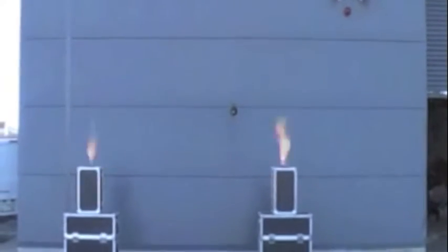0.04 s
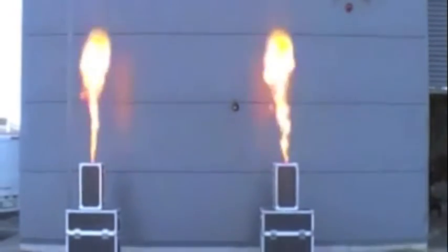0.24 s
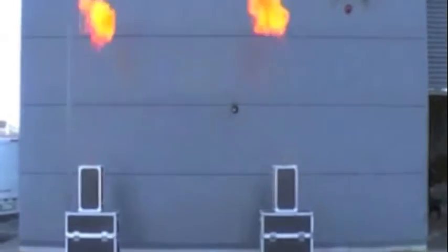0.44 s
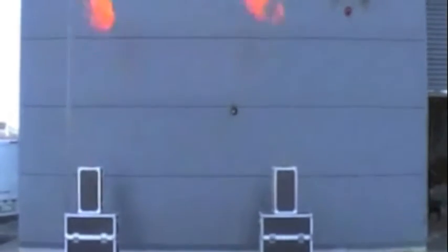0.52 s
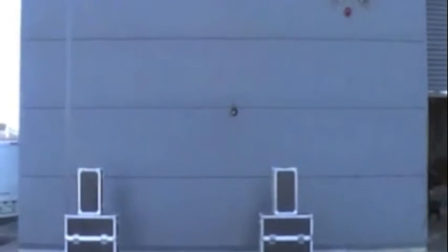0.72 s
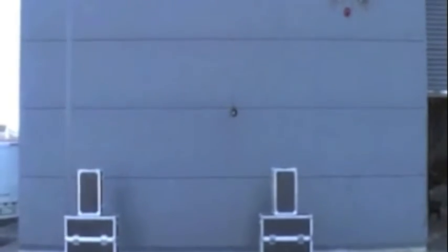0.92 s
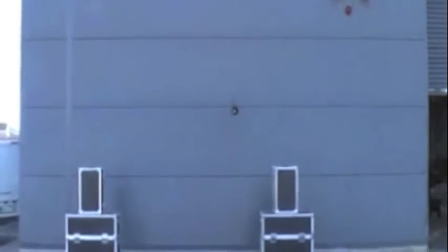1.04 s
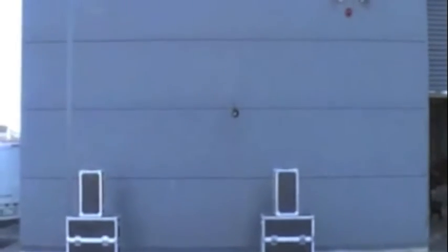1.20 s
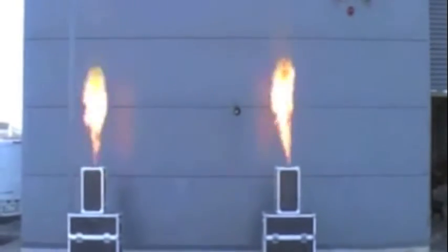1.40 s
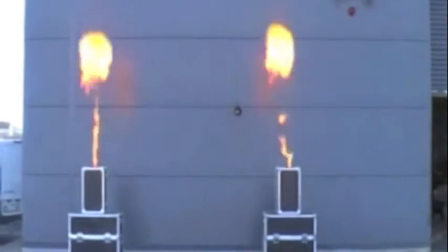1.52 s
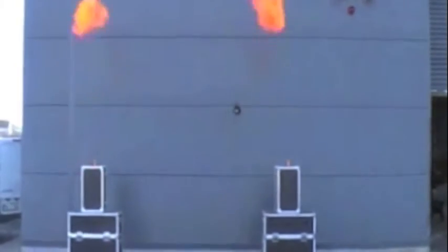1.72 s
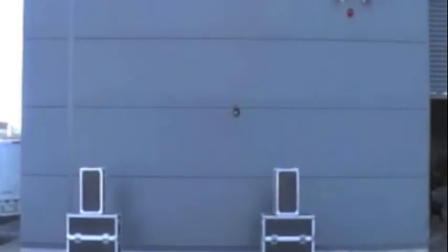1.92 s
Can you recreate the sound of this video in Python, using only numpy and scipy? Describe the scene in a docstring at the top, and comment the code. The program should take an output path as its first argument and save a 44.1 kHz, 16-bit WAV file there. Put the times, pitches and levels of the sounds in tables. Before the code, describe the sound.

Flame projectors straight ahead fire twice, each time with a low boom and a short ragged roar. Brief gas hisses come before each burst, slightly to the right, echoing off a metal wall over humming machinery and light wind.

```python
"""In front of a large metal wall, machinery hums all round and a light breeze ruffles the microphone.
Two short, flameless hisses of gas come from a little to the right. At 0.2 s two flame projectors
straight ahead fire as one: a valve opens, gas hisses, catches with a low boom and a ragged roar, and
the fireball flutters away upwards. Two more hisses follow, the first ending in a faint puff, and near
1.5 s the projectors fire again. The wall answers every shot and hiss."""
import sys
import numpy as np
from scipy import signal
from scipy.fft import rfft, irfft, next_fast_len
from scipy.io import wavfile
from scipy.ndimage import map_coordinates

SR = 44100
rng = np.random.default_rng(int(sys.argv[2]) if len(sys.argv) > 2 else 0)


def unload_audio(sound):
    """Save the sound as a 16-bit wav file, at the path given as the first command line argument."""
    columns = np.transpose(np.atleast_2d(sound))
    # keep every value between -1 and 1, then stretch to whole-number steps
    steps = np.round(np.clip(columns, -1, 1) * 32767)
    wavfile.write(sys.argv[1], SR, steps.astype(np.int16))


N = 85995


def amp(db):
    """Decibels to gain."""
    return 10 ** (np.asarray(db) / 20)


def unit(x):
    """Scaled to rms 1."""
    return x / np.sqrt(np.mean(x ** 2) + 1e-20)


def along(points, hz):
    """Reads a curve of (f/Hz, value) points on a log frequency axis."""
    freqs, values = np.transpose(points)
    return np.interp(np.log(hz + 1), np.log(freqs + 1), values)


def wobble(rate):
    """A smooth random curve, rate knots a second."""
    knots = rng.standard_normal(int(N * rate / SR) + 4)
    return map_coordinates(knots, [np.arange(N) * rate / SR])


def filtered(x, response):
    """Filters x by a gain given as a function of frequency."""
    size = next_fast_len(N + SR // 2)
    return irfft(rfft(x, size) * response(np.fft.rfftfreq(size, 1 / SR)), size)[..., :N]


def spread(pair, width):
    """Left and right from a mid signal and a share of a side signal."""
    mid, side = pair
    return np.array([mid + width * side, mid - width * side]) / np.hypot(1, width)


def rush(spectrum, width=0):
    """Coloured stereo noise of rms 1."""
    noise = filtered(rng.standard_normal((2, N)), lambda hz: amp(along(spectrum, hz)))
    return unit(spread(noise, width))


def gate(start, length, attack_s, release_s):
    """Rises, holds, then falls 20 dB in each release time."""
    age = np.arange(N) / SR - start
    return np.clip(age / attack_s, 0, 1) * amp(-20 * np.maximum(age - length, 0) / release_s)


def tone(hz):
    """A sine of rms 1 on a pitch curve."""
    return np.sqrt(2) * np.sin(2 * np.pi * (np.cumsum(hz) / SR + rng.random()))


# Fan noise around the microphone: f/Hz, relative level/dB
FAN_SPECTRUM = [(15, -40), (25, -17), (45, -8), (70, 1.5), (95, 6), (130, 1), (200, -2.5), (300, -9.5),
                (470, -8), (570, -5), (750, -12), (1000, -5), (1350, -8), (1650, -14.5), (2300, -21),
                (3500, -22.5), (5000, -33), (7000, -45), (12000, -45)]
# How alike the fans sound left and right: f/Hz, correlation/0-1
FAN_LIKENESS = [(30, 0.3), (100, 0.23), (250, 0.76), (600, 0.87), (1100, 0.82), (3000, 0.97), (4500, 1),
                (12000, .98)]
def fans():
    """A steady bed of moving air, wide in the bass and central in the treble."""
    def mid_side_gains(hz):
        angle = np.arccos(np.clip(along(FAN_LIKENESS, hz), -1, 1)) / 2
        return amp(along(FAN_SPECTRUM, hz)) * [np.cos(angle), np.sin(angle)]
    air = filtered(rng.standard_normal((2, N)), mid_side_gains)
    return amp(-37.5) * unit(spread(air, width=1))


# Machine tones in the background: f/Hz, relative level/dB
MACHINE_TONES = [(97, -44), (581, -54), (657, -55), (850, -54), (873, -53), (921, -53), (969, -56),
                 (995, -50), (1066.5, -51), (1092, -51), (1163, -56), (1308, -57), (1334, -57), (1432, -57)]
def machine_hum(waver_db=1.2, drift_hz=0.7):
    """A low hum and a cluster of whines, each wavering in level and pitch."""
    return amp(0.3) * sum(amp(db + waver_db * wobble(9.36)) * tone(hz + drift_hz * wobble(12.24))
                          for hz, db in MACHINE_TONES)


# Wind right on the microphone: f/Hz, relative level/dB
BREEZE_SPECTRUM = [(20, -31), (60, 0), (110, -2), (190, 3), (260, -7), (350, -11), (500, -37), (900, -12),
                   (2500, -73)]
def breeze(gust_db=4.5):
    """Light wind rumbles in lumps, pushing the two microphone ports mostly in opposite senses."""
    return amp(-43) * unit(rush(BREEZE_SPECTRUM, width=2.9) * amp(gust_db * wobble(22)))


# Ring of the metal wall beyond the projectors: f/Hz, time to fall 60 dB/s
WALL_DECAY = [(100, 0.4), (1000, 0.71), (4000, 1), (8000, 0.69), (12000, 0.49)]
def wall_echo(sound):
    """The wall throws the sound back to the microphone; each frequency dies at its own speed."""
    hz, t, noise = signal.stft(rng.standard_normal((2, SR)), SR, nperseg=256)
    decay = amp(-60 * t / along(WALL_DECAY, hz)[:, None])
    tail = spread(signal.istft(noise * decay, SR, nperseg=256)[1], width=0.017)
    tail /= np.linalg.norm(tail[0])
    return signal.fftconvolve(sound.mean(axis=0)[None], tail, axes=1)[:, :N]


# Unlit gas leaving the nozzle: f/Hz, relative level/dB
SPRAY_SPECTRUM = [(20, -60), (150, -14), (1200, -11.5), (2000, -9), (2600, -3), (3300, -6), (4400, -3.5),
                  (5000, -4), (5700, -0.5), (7200, 1.5), (8400, 5), (9300, 1), (10500, 4.5), (12000, 0.5)]
# Whistling resonances of the nozzle: f/Hz, bandwidth/Hz, boost/dB
NOZZLE_RESONANCES = [(2560, 210, 3), (5000, 220, 6), (8300, 640, 0.5), (10600, 400, 0.5)]
def spray(tilt_db, pivot_hz=8000):
    """Turbulent gas, coloured by the nozzle's resonances and tilted by tilt_db per octave."""
    def colour(hz):
        whistle_db = sum(db / (1 + (2 * (hz - centre) / width) ** 2)
                         for centre, width, db in NOZZLE_RESONANCES)
        return amp(along(SPRAY_SPECTRUM, hz) + whistle_db + tilt_db * np.log2((hz + 1) / pivot_hz))
    return unit(filtered(rng.standard_normal(N), colour))


# Flameless hisses, a little right of the microphone:
# t/s, length/s, level/dB, sag at mid-length/dB, starting width/0-1, tilt/dB per octave, opening spit/dB
GAS_HISSES = [(-.06, 0.11, -30, 2.5, 0, -0.5, 0), (.145, 0.055, -30, -0.5, .01, 0.5, 2.5),
              (0.537, 0.2, -30, 5.5, 0.56, -0.5, 1.5), (1.001, 0.16, -33, 1, 0.96, -1.5, 1.5)]
def hiss(start, length, db, sag_db, width, tilt_db, spit_db):
    """A valve lets gas through the nozzle; a hiss that starts wide draws in to the middle."""
    leak_s, spit_s, attack_s, release_s = 0.031, 0.031, 0.019, 0.035
    age = np.maximum(np.arange(N) / SR - start, 0)
    progress = np.minimum(age / length, 1)
    sag = sag_db * np.sin(np.pi * progress) ** 2
    spit = spit_db * np.exp(-(age / spit_s) ** 2)
    level_db = db - sag + spit + 0.68 * wobble(39.8)
    # a little gas escapes just before the valve is open
    leak = amp(-16.5) * gate(start - leak_s, leak_s, attack_s, release_s)
    opening = np.maximum(leak, gate(start, length, attack_s, release_s))
    narrowing = np.clip((0.95 - progress) / 0.41, 0, 1)
    mid = spray(tilt_db)
    side = width * narrowing * spray(tilt_db)
    return amp(level_db) * opening * np.array([mid + side, mid - side])


def throb(hz, wander_hz):
    """The unsteady pulsing of a ball of burning gas."""
    return tone(hz + wander_hz * wobble(80)) * amp(wobble(60))


# Small puffs straight ahead: t/s, length/s, level/dB
GAS_PUFFS = [(0.201, 0.019, -28.5), (0.707, 0.093, -41.5)]
def puff(start, length, db):
    """A little gas burns with a soft, hollow puff."""
    return amp(db) * gate(start, length, attack_s=0.0044, release_s=0.016) * throb(262, wander_hz=20.7)


# The loose fireball above the projectors: f/Hz, relative level/dB
FLUTTER_SPECTRUM = [(20, -29), (70, 4.5), (120, 1.5), (270, 2), (420, -5.5), (800, -33), (2000, -21),
                    (8000, -73)]
def flutter(shut, attack_s=0.02, hold_s=0.078):
    """The fireball burns out unevenly after the valve shuts."""
    burnout = gate(shut - attack_s, attack_s + hold_s, attack_s, release_s=0.12)
    return amp(-10.5) * burnout * unit(rush(FLUTTER_SPECTRUM, width=0.24) * amp(1.2 * wobble(90)))


# The projectors' gas jet, dead centre: f/Hz, relative level/dB
JET_SPECTRUM = [(300, 2), (520, 22.5), (1000, 9.5), (3000, 3.5), (4500, 3.5), (6000, 6), (7500, 6),
                (9000, 3), (10500, 5.5), (12000, -19)]
def jet(start, length, burning, spurt_db, attack_s=0.0023, unlit_db=-3):
    """Gas rushes out with a first spurt that dies fast; the flow is softer until it burns."""
    flow = amp(unlit_db) * gate(start, length, attack_s, release_s=0.045)
    spurt = amp(spurt_db) * gate(start, attack_s, attack_s, release_s=0.01)
    return np.maximum(np.hypot(flow, spurt), burning) * rush(JET_SPECTRUM)


def boom(lit, delay_s=0.018):
    """The swelling fireball pulses just after the gas catches."""
    pulsing = spread([throb(117, wander_hz=7) for _ in range(2)], width=0.058)
    return gate(lit + delay_s, length=0.068, attack_s=0.014, release_s=0.06) * pulsing


# The burning jet as it reaches the microphone: f/Hz, relative level/dB
ROAR_SPECTRUM = [(15, -45), (25, -24), (45, -12), (65, -4.5), (90, -4.5), (185, 2.5), (250, -4),
                 (320, -6.5), (430, -4), (480, -14.5), (525, 1.5), (580, -8.5), (630, -7), (750, -9),
                 (850, -16.5), (1300, -16.5), (2000, -21), (3000, -24), (4500, -41), (12000, -52)]
def roar(lit, burn_s, rumble_hz=450, sag_db=3):
    """Eddies of burning gas; their bass thins as the fireball climbs."""
    eddies = rush(ROAR_SPECTRUM, width=0.01)
    rumble = filtered(eddies, lambda hz: 1 / (1 + (hz / rumble_hz) ** 2) ** 2)
    climb = np.clip((np.arange(N) / SR - lit) / burn_s, 0, 1)
    return eddies - rumble + amp(-sag_db * climb ** 2) * rumble


# Flame shots, straight ahead of the microphone: t/s, valve open/s, ignition delay/s,
# roar level/dB, jet level/dB, boom over roar/dB, first spurt over jet/dB
FLAME_SHOTS = [(0.21, 0.19, 0.037, -20.5, -28, 7, -17), (1.461, 0.17, 0.032, -21, -32, 3.5, -1.5)]
def flame(start, length, delay, roar_db, jet_db, boom_db, spurt_db):
    """One shot: the jet spurts, ignites, booms and roars; the loose fireball burns out."""
    lit, burn_s = start + delay, length - delay
    burning = gate(lit, burn_s, attack_s=0.018, release_s=0.061)
    gas = jet(start, length, burning, spurt_db)
    fire = burning * roar(lit, burn_s) + amp(boom_db) * boom(lit) + flutter(start + length)
    return amp(jet_db) * gas + amp(roar_db) * fire


def scene():
    """From the microphone: flames ahead, hisses a little to the right, machinery all round."""
    flames = sum(flame(*row) for row in FLAME_SHOTS) + sum(puff(*row) for row in GAS_PUFFS)
    hisses = sum(hiss(*row) for row in GAS_HISSES) * amp([[-0.5], [0.5]])
    echo = wall_echo(amp(-13.5) * flames + amp(-9.5) * hisses)
    return fans() + machine_hum() + breeze() + echo + hisses + flames


def record(dry, top_hz=11700):
    """The camera keeps nothing above its band limit."""
    return filtered(dry, lambda hz: hz < top_hz)


dry = scene()
out = record(dry)
unload_audio(out)
```